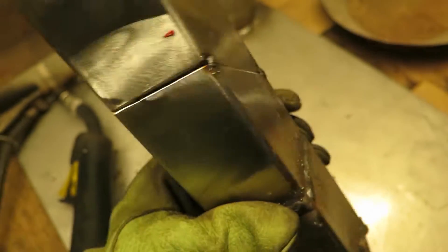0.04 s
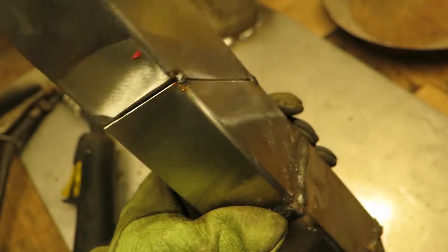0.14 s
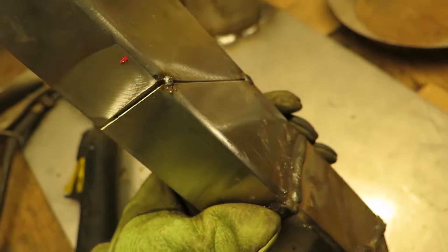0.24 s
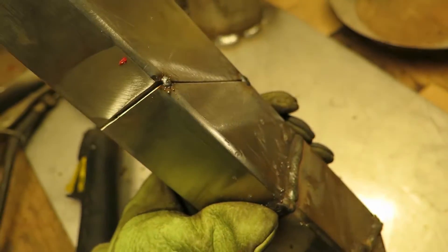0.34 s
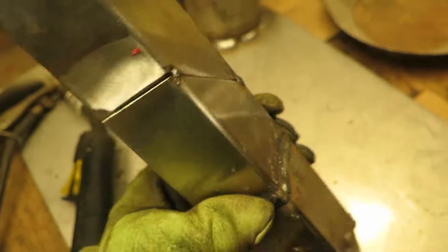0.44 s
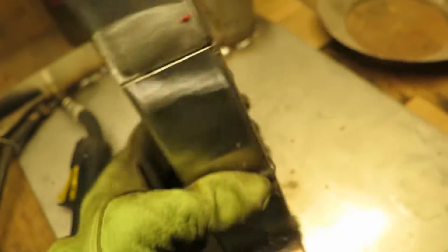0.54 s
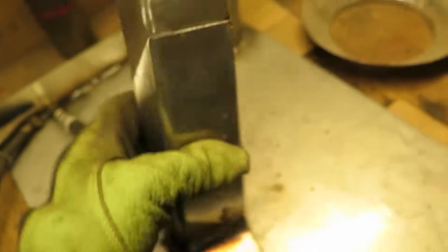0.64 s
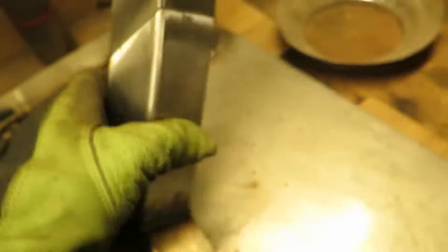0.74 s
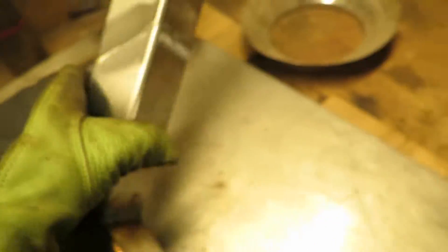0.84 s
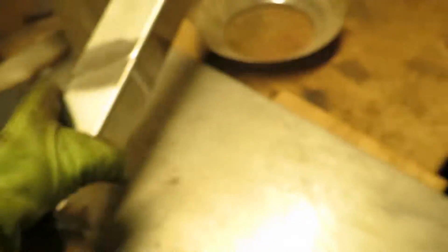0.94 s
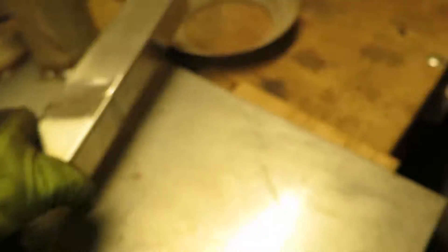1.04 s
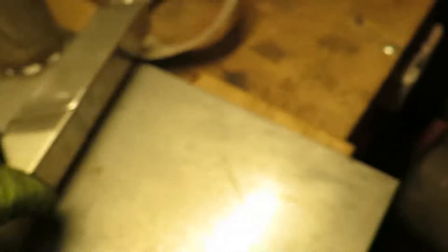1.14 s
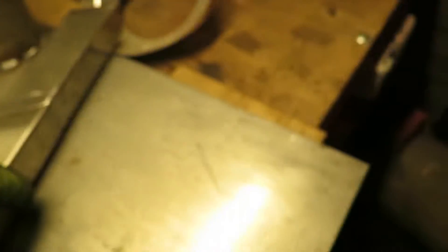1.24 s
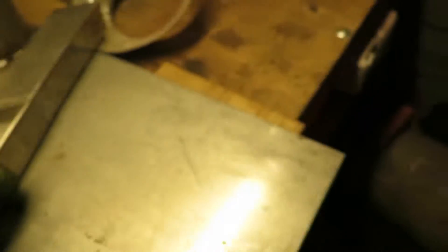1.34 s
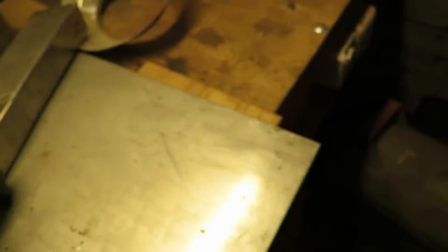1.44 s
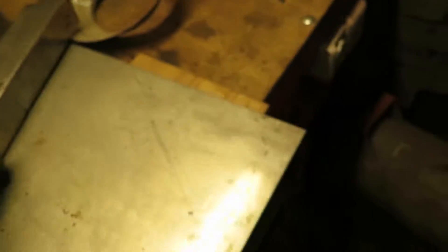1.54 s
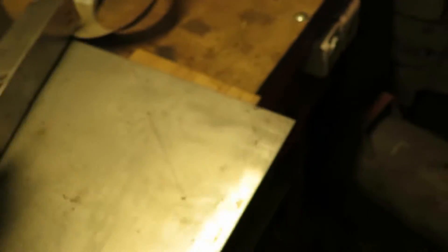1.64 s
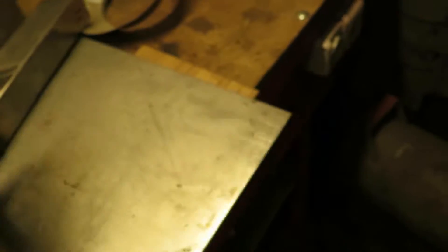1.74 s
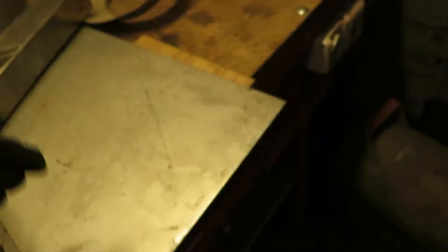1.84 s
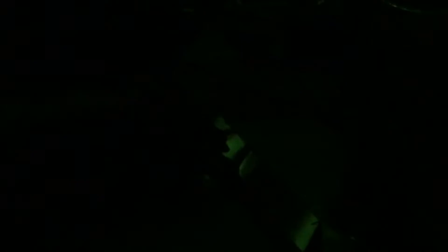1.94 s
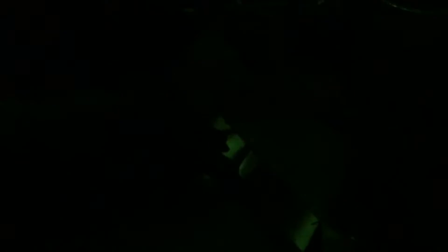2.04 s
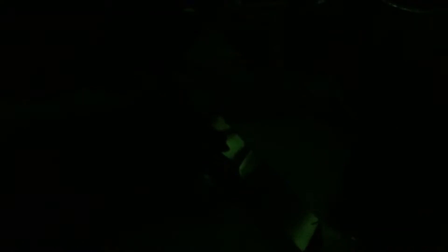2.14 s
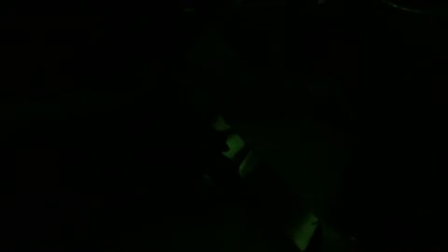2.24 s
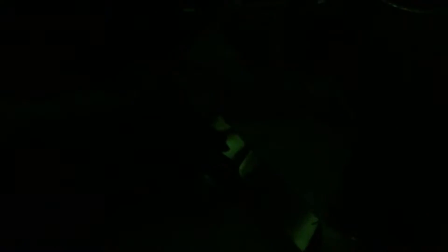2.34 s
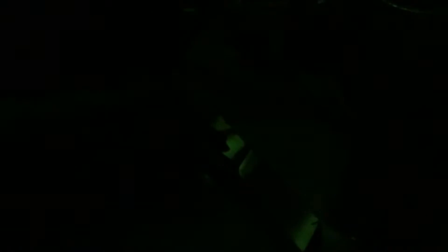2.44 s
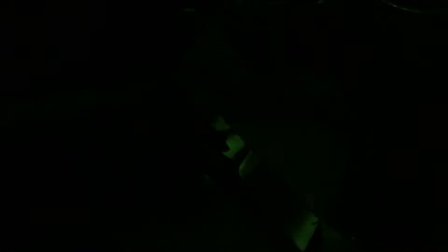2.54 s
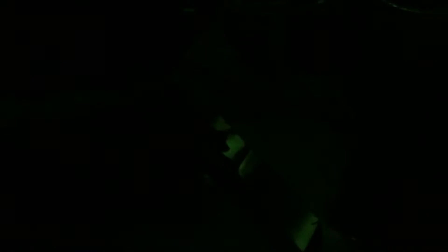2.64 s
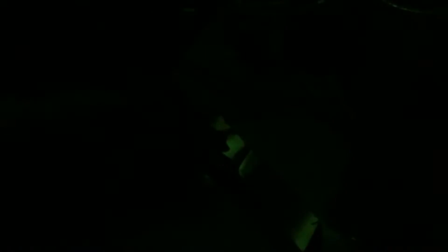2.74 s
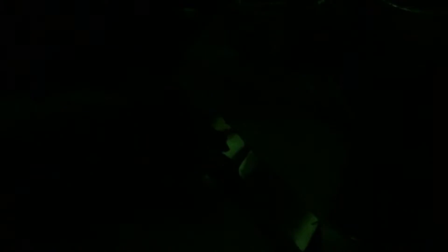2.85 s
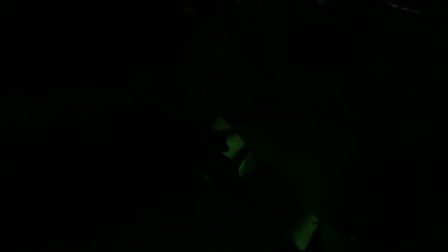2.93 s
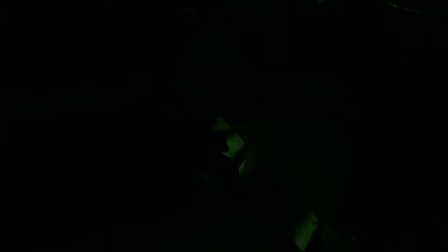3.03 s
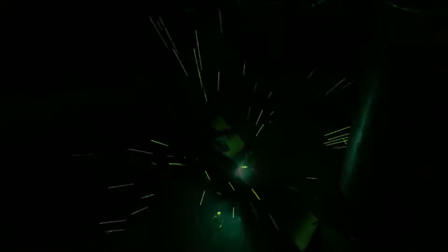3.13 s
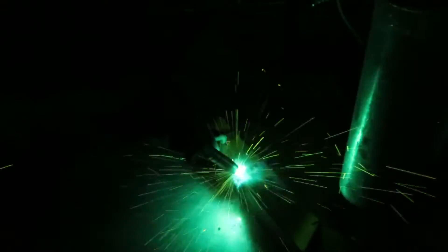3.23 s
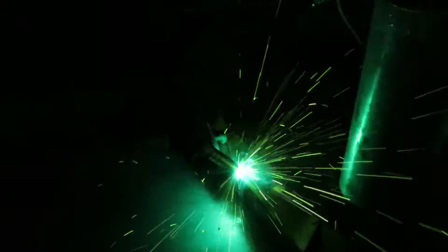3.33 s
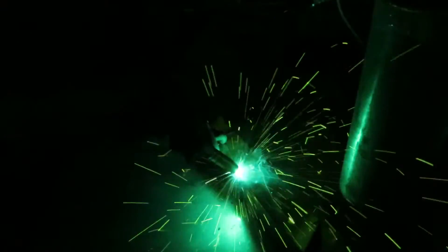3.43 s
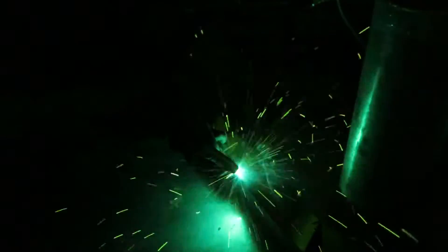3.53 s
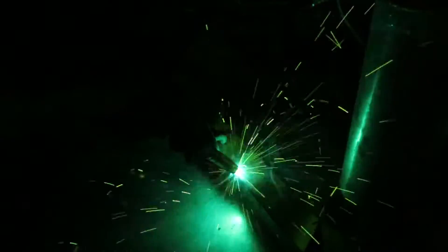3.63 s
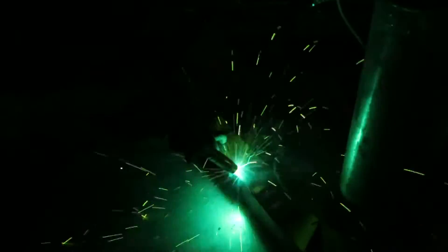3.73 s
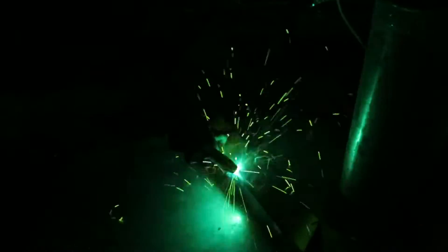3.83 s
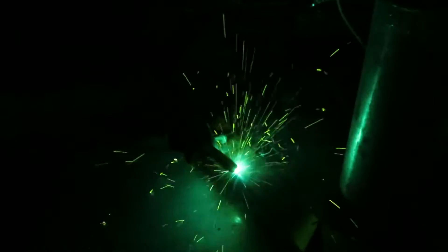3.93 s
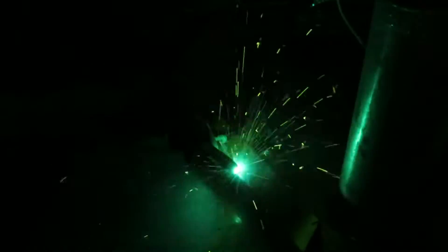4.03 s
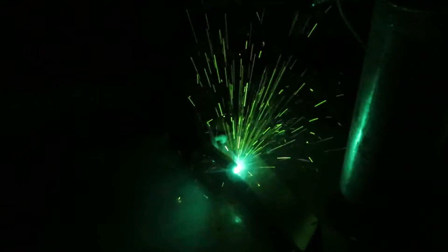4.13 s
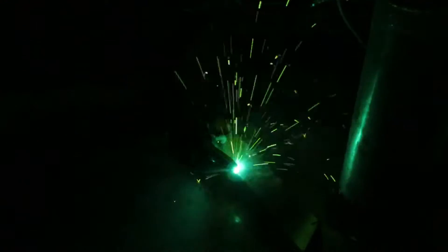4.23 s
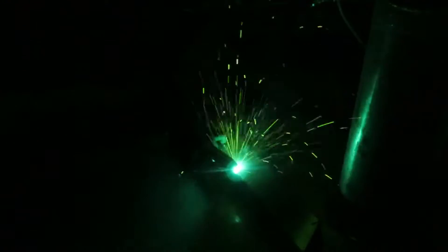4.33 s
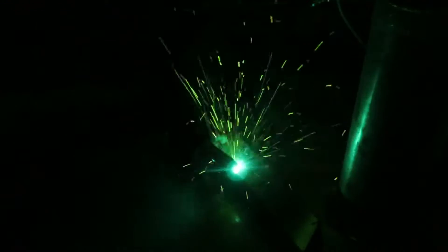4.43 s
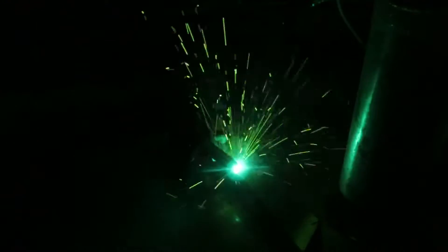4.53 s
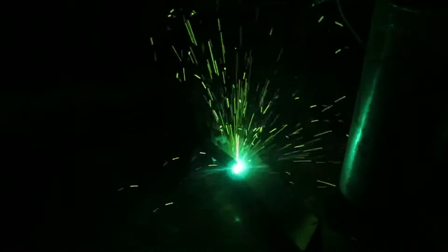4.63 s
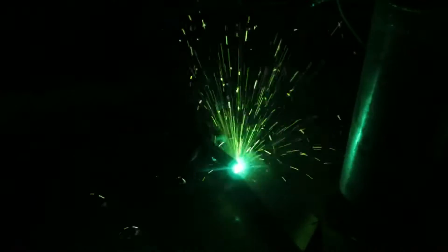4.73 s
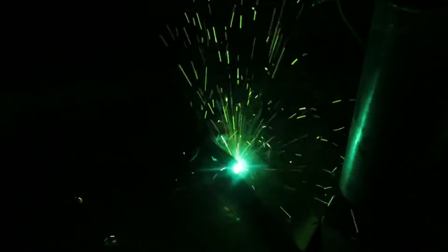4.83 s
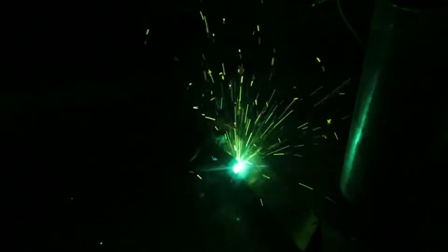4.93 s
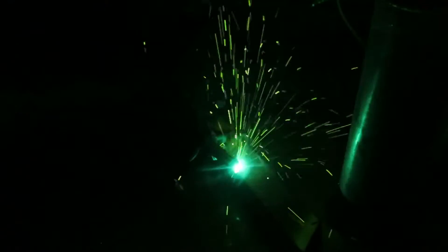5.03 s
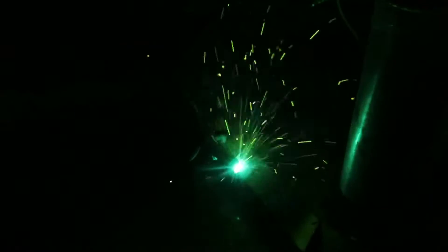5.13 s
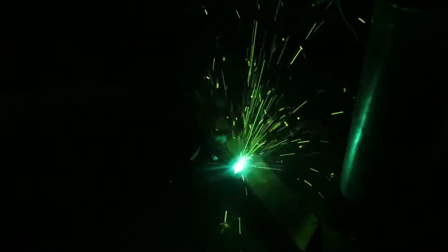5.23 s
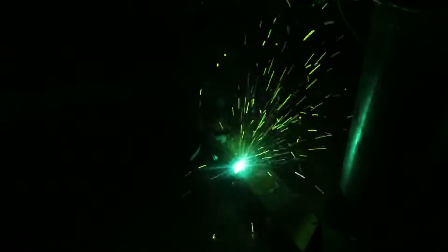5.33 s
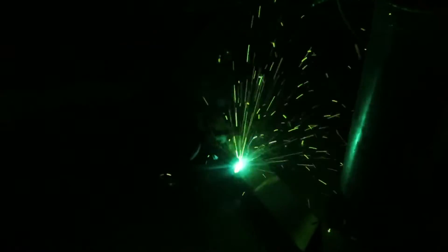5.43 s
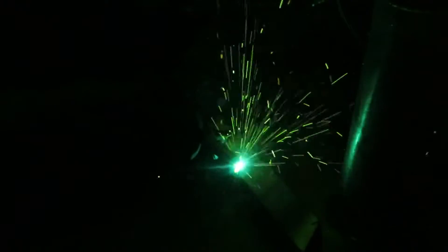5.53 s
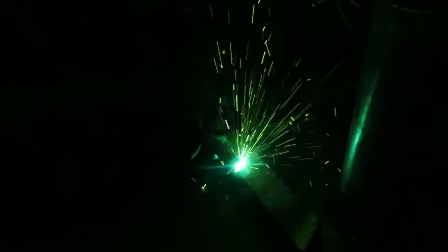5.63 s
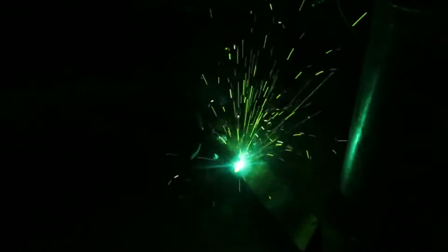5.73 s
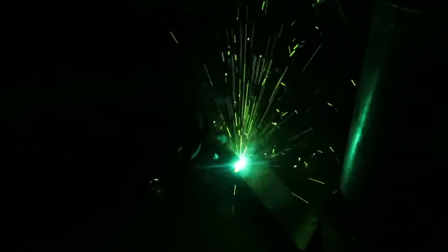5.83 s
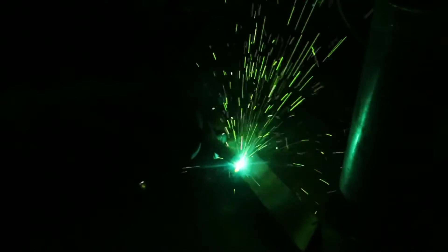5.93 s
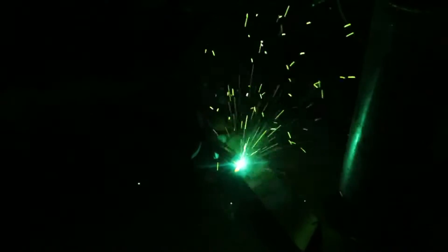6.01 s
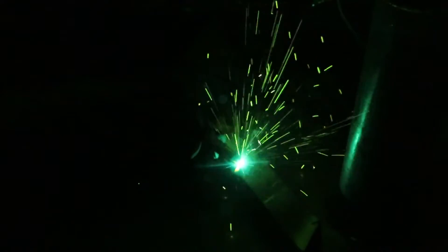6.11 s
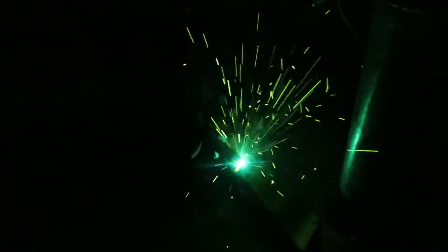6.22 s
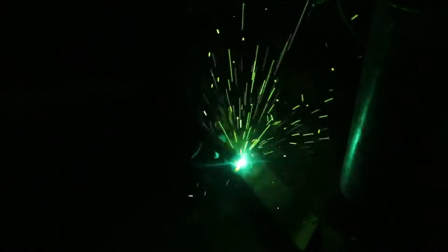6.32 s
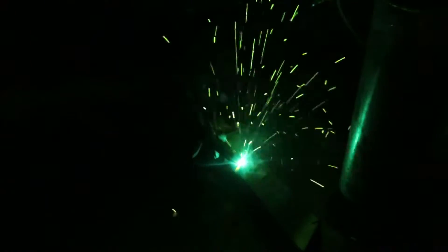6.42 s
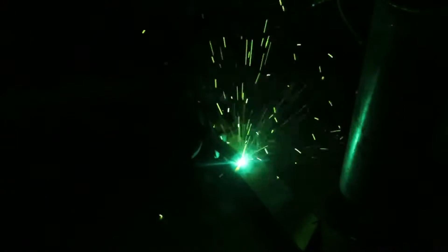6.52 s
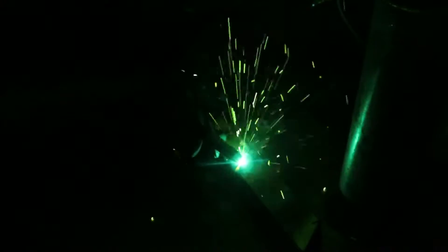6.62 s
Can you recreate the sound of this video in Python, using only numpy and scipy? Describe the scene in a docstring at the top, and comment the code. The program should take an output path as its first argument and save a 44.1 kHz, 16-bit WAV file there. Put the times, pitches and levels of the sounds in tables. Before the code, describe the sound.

In a quiet workshop, a gloved hand faintly rubs steel, then knocks and slides a folded part across a metal sheet on a bench, with short rings, thuds and rasps. The scene jumps to a welder's low hum and fan noise. Gas puffs and hisses, the wire pops, and a bright, close arc crackles steadily with spatter while the background sinks away.

```python
"""Quiet room air and faint strokes on steel; then a folded stainless part is knocked and slid over a sheet.
Slips rasp and rumble the sheet; each knock rings steel modes, thumps the bench and clashes.
An abrupt change of scene: a MIG welder hums over fan noise, gas puffs and rushes, the wire pops.
The arc then crackles from irregular snaps, fizz and spatter, with a faint singing mode of the part.
The arc is so loud that a gain control pushes hum and gas far down."""
import sys
import numpy as np
from scipy import signal
from scipy.fft import rfft, irfft
from scipy.io import wavfile
from scipy.ndimage import uniform_filter1d

SR = 44100
rng = np.random.default_rng(int(sys.argv[2]) if len(sys.argv) > 2 else 0)


def put_to_file(sound):
    """Save the sound as 16-bit audio at rate SR, in the file named by the first command-line argument."""
    columns = np.atleast_2d(sound).T  # one column per channel
    safe = np.clip(columns, -1, 1)
    whole_steps = np.round(safe * 32767)
    wavfile.write(sys.argv[1], SR, whole_steps.astype(np.int16))


N = 294147

# knocks of part on sheet: t/s, relative ring level/dB, thump re ring/dB, bright clash re ring/dB, favoured f/Hz
KNOCKS = [(0.725, -3, -6, -27, 520), (0.769, -0.5, 1.5, -31, 480), (0.778, 0, -9, -30, 576),
          (0.841, -2.5, -12, -15, 764), (0.88, -5.5, -28, -15, 836), (0.908, -4.5, -28, -11.5, 535),
          (0.986, -0.5, -21, -8, 610), (1.005, 3, -28, -18, 490), (1.043, 3, -36, -17, 836),
          (1.172, -6, -28, -13, 544), (1.223, 0, -5, 1.5, 1290), (1.435, -9, -6, -14, 510),
          (1.488, -7, -19, -1.5, 577), (1.526, -2.5, -12, -4, 846), (1.566, -10.5, 3, -25, 390),
          (1.645, -15, 0, -21, 446), (1.751, -20.5, 4.5, -30, 400), (1.805, -14.5, -8, -0.5, 1080),
          (1.832, -15, -4, -5.5, 320)]
# modes of part and sheet: f/Hz, level/dB
STEEL_MODES = [(195, -4.5), (272, -10.5), (308, -3), (398, -6.5), (464, 3), (478, -1.5), (511, -1.5),
               (530, 1), (564, 2.5), (643, -1), (707, -4), (778, -3.5), (821, 1.5), (850, -4), (991, -7.5),
               (1205, -14), (1333, -13), (1622, -10), (1690, -24), (1809, -17), (1872, -11), (2281, -15),
               (2410, -13), (2671, -13.5), (3590, -18), (4410, -20)]
# modes of the bench under the sheet: f/Hz, level/dB
BENCH_MODES = [(72, -8), (150, -4), (205, -14), (262, 3.5), (315, 2)]
# drag of the part, rumble of the sheet: t/s, relative level/dB
DRAG = [(0.0, -51), (0.28, -49), (0.66, -45), (0.746, -23), (0.878, -20.5), (0.93, -26.5), (1.026, -24),
        (1.518, -27), (1.9, -31.5)]
# strokes of glove or edge on steel: t/s, length/s, relative rasp level/dB, hiss re rasp/dB
SCRAPES = [(0.048, 0.033, -49.5, 1), (0.222, 0.071, -51.5, -0.5), (0.356, 0.025, -50, 0),
           (0.4, 0.15, -54, 1), (0.496, 0.06, -50, 2), (0.55, 0.07, -45, 0), (0.608, 0.062, -31, -9),
           (0.686, 0.035, -26, -24), (0.718, 0.018, -18.5, -8), (0.978, 0.032, -25, -26),
           (1.177, 0.058, -26, -8), (1.28, 0.013, -28.5, 1), (1.317, 0.077, -28, 1.5),
           (1.427, 0.03, -25, 1), (1.47, 0.085, -25, -23), (1.55, 0.077, -33, -17),
           (1.709, 0.0092, -33.5, -11)]
# spectrum of thud and rumble: f/Hz, level/dB
THUD_SPECTRUM = [(25, -20), (70, 3.5), (140, -7), (280, -13), (370, 0), (520, -3), (820, -2.5), (1000, -3),
                 (2000, -9.5), (4000, -16.5), (10000, -39.5)]
# spectrum of the clash of metal on metal: f/Hz, level/dB
CLASH_SPECTRUM = [(400, -31), (950, -20), (1250, 9), (1650, -2), (2400, -2), (3200, -7), (6000, -4),
                  (12000, -3.5), (15500, -17)]
# spectrum of the rasp: f/Hz, level/dB
RASP_SPECTRUM = [(300, -9), (1000, -1.5), (1500, -6), (3000, -0.5), (5000, -5.5), (8000, -9), (12400, -10),
                 (15500, -28)]
# spectrum of the edge's hiss: f/Hz, level/dB
EDGE_SPECTRUM = [(1000, -14.5), (4000, -4), (8000, -1.5), (12400, 0.5), (15500, -7)]
# spectrum of room air: f/Hz, level/dB
ROOM_SPECTRUM = [(20, -32), (40, 5), (250, 3.5), (550, -9.5), (900, -6.5), (1600, -10), (6500, -17.5),
                 (12000, -17), (15000, -34)]
# spectrum of the fan's rush: f/Hz, level/dB
FAN_SPECTRUM = [(20, -13), (45, 2.5), (110, 4), (200, 0.5), (270, -9), (700, -7), (1150, -8), (1700, -9),
                (2500, -11.5), (4200, -14.5), (8500, -17.5), (12200, -16), (13500, -35), (15000, -49)]
# spectrum of steady gas flow: f/Hz, level/dB
GAS_SPECTRUM = [(300, -25), (900, -20), (1450, -0.5), (2000, -14), (3200, -11.5), (3500, -5.5), (4200, -4),
                (5200, 6), (6600, -1), (8200, 3.5), (10700, -0.5), (12000, 4.5), (13200, -9), (14600, 3),
                (15300, -30)]
# spectrum of the valve's puff: f/Hz, level/dB
PUFF_SPECTRUM = [(40, -5), (300, 3), (900, 16), (2000, 3), (5000, 3), (15000, -36)]
# arc spectrum at the start, also of the pops: f/Hz, level/dB
ARC_EARLY_SPECTRUM = [(40, -33), (175, -11), (270, -16), (600, -14.5), (840, -16.5), (1000, -13.5),
                      (1480, -10), (1750, -21), (2450, -10), (3200, -14), (3480, -7), (5200, -7),
                      (6400, -10.5), (7600, -3.5), (9000, -5.5), (10500, 0), (12000, -1.5), (14000, -0.5),
                      (15500, -11)]
# arc spectrum further along the seam: f/Hz, level/dB
ARC_LATE_SPECTRUM = [(40, -35), (110, -20.5), (180, -16), (270, -19.5), (600, -19), (840, -22.5),
                     (1000, -16), (1480, -15.5), (1750, -26), (2450, -12.5), (3200, -15), (3600, -7.5),
                     (5200, -8), (6400, -9.5), (7500, -7), (9000, -4.5), (10000, -1), (12500, -1.5),
                     (15500, -6)]
# stereo width of near sounds: f/Hz, side minus mid/dB
WIDTH = [(100, -9), (500, 0), (1200, -4), (2500, -3.5), (6000, 1), (15000, 0)]
# shaft, transformer and blade tones: f/Hz, level/dB, change as the gas valve opens/dB
HUM = [(46.5, -38.5, -0.5), (100.1, -36, -1.5), (137, -40, -2), (640.5, -41.5, -12), (1072, -46.5, -1),
       (1347, -50, -5)]
# narrow resonances of the fan: f/Hz, width/Hz, strength/dB
FAN_WHISTLES = [(1134, 145, 5), (10600, 65, 4), (11130, 60, 10.5), (12170, 79, 8.5), (13100, 110, 12),
                (13900, 140, 18)]
# narrow resonances of the nozzle: f/Hz, width/Hz, strength/dB
NOZZLE_PEAKS = [(4280, 130, 7.5), (4990, 250, 1.5), (5250, 340, -6.5), (9800, 71, 7), (12000, 400, 6)]
# narrow resonances in the arc's sound: f/Hz, width/Hz, strength/dB
SEAM_PEAKS = [(464, 17, -1.5), (668, 48, 1), (1117, 110, 0), (2140, 140, 2), (5000, 270, 0),
              (7400, 870, -3.5), (12000, 170, 2.5)]
# narrow hollows in the colour of gas and burning arc: f/Hz, width/Hz, depth/dB
HOLLOWS = [(3470, 150, -7.5), (4590, 150, -4.5), (5730, 320, -3), (6690, 160, -12.5), (9000, 260, -12),
           (11300, 440, -1)]
# wire touches with a faint fizz, then blows apart: t/s, relative level/dB, t60/s
STRIKES = [(3.218, -51, 0.23), (3.2305, 3, 0.019), (3.2900, -3, 0.043), (3.3345, -9, 0.18)]
# droplets bursting into a spray: t/s, relative starting level/dB, t60/s
SPATTER = [(3.4261, -14.5, 0.061), (3.6019, -13, 0.073), (3.708, -18.5, 0.085), (3.8, -14, 0.085),
           (3.857, -22, 0.12), (3.9565, -17, 0.12), (4.0578, -18, 0.075), (4.856, -15.5, 0.11),
           (4.9202, -12, 0.11), (4.9972, -16, 0.033), (5.0794, -10, 0.058), (5.155, -12.5, 0.04),
           (5.3361, -19, 0.082), (5.387, -10.5, 0.04), (5.4873, -18.5, 0.078), (5.549, -13.5, 0.036),
           (5.718, -15, 0.047), (5.8211, -11, 0.041), (5.8948, -12, 0.04), (6.03, -14.5, 0.041),
           (6.0816, -17, 0.029), (6.106, -9.5, 0.038), (6.145, -16, 0.05), (6.2941, -11, 0.041),
           (6.31, -10.5, 0.06), (6.4048, -21, 0.071), (6.5589, -12, 0.032), (6.6177, -22, 0.043)]
# burn of the arc: t/s, relative level/dB
BURN = [(3.46, -20.5), (3.54, -17.5), (3.63, -24.5), (3.72, -21.5), (3.76, -25.5), (3.87, -22), (4.44, -23),
        (4.6, -21), (4.85, -25), (4.95, -22.5), (5.25, -25.5), (5.34, -25), (5.42, -27.5), (5.91, -20.5),
        (6.07, -20), (6.12, -25), (6.29, -21.5), (6.34, -20.5), (6.39, -21), (6.64, -22)]
# balance of the arc between the channels: t/s, left minus right/dB
TORCH_PAN = [(3.3, -2), (4.8, -1.5), (5.5, -1.5), (6.6, -1.5)]
# faint singing of the heated part: t/s, relative level/dB
SINGING = [(3.4, -62), (4.8, -72), (5.0, -49.5), (5.3, -53), (5.55, -58), (5.67, -51.5), (5.79, -44),
           (5.9, -57), (6.6, -73)]

CUT_S = 1.905  # handling ends, welder is running
# steel and bench
FAVOUR_DB, FAVOUR_OCTAVES = 11, 0.25  # contact point favours modes around one frequency
CONTACT_DETUNE, BENCH_T60_S = 0.006, 0.11
UPPER_FROM_HZ, UPPER_WIDTH_HZ, UPPER_DB = 950, 20, 4.5  # steel modes standing out of noise; strength
# sliding
DRAG_RASP_DB = -13  # re drag rumble
RATTLE_DB, RATTLE_T60_S = -23, 0.25  # rattling on after a knock, re knock
SCRAPE_RUMBLE_DB, SCRAPE_RING_DB = -7.5, -6  # re scrape rasp
SCRAPE_SWELL, SCRAPE_T60_S = 0.3, 0.18  # swell as share of stroke length; release
# gas
VALVE_S, VALVE_RISE_S = 2.940, 0.043
FLOW_DB, OVERSHOOT_DB, SETTLE_S = -19.5, 9.5, 0.15
# arc
STEADY_S = 3.425  # sputtering ends, full burn
SHORT_LEAD_S = 0.0009  # median lead of shorting tick over snap
PING_HZ, PING_T60_S = 12350, 0.0022
PING_DB, PING_PAN_DB = -6, 1.5  # re burn; left minus right, ahead of TORCH_PAN
ARC_LOUDER_DB = 40  # boost of the arc and largest gain cut
TOP_HZ = 15700


def undb(db):
    """Decibels to gain."""
    return np.exp(np.asarray(db) * (np.log(10) / 20))


def unit(x):
    """Scale to rms 1."""
    return x / np.sqrt(np.mean(x ** 2) + 1e-18)


def clock():
    """Time of every sample in s."""
    return np.arange(N) / SR


def curves(table):
    """Table columns, interpolated linearly in time."""
    s, *columns = np.transpose(table)
    return [np.interp(clock(), s, c) for c in columns]


def after(s, fade=0.003):
    """Linear switch-on from time s over fade seconds."""
    return np.clip((clock() - s) / fade, 0, 1)


def walk(rate):
    """Random levels at a rate in Hz, joined by straight lines; spread near 1."""
    knots = rng.standard_normal(N // max(int(SR / rate), 1) + 2)
    position = np.linspace(0, len(knots) - 1, N)
    return np.sqrt(3 / 2) * np.interp(position, np.arange(len(knots)), knots)


def noise():
    """Two independent white noises."""
    return rng.standard_normal((2, N), dtype=np.float32)


def clicks(times, sizes):
    """Single-sample impulses."""
    index = np.clip(np.asarray(times) * SR, 0, N).astype(int)
    return np.bincount(index, sizes, N + 1)[:N]


def add(track, s, sound):
    """Mix a short sound into a track at time s."""
    start = int(s * SR)
    track[start:start + len(sound)] += sound[:N - start]


def through(x, response):
    """Convolve with one response or a left and a right one."""
    x, response = (np.atleast_2d(v).astype(np.float32) for v in (x, response))
    return signal.oaconvolve(x, response, axes=1)[:, :N]


def colour(x, points, peaks=(), hollows=(), size=4096):
    """Minimum-phase filter; a peak adds twice its strength as power, a hollow cuts by its depth."""
    f = np.maximum(np.arange(size // 2 + 1) * SR / size, 1)
    hz, db = np.transpose(points)
    power = 1 + sum(undb(2 * d) * 2 / (1 + (2 * (f - c) / w) ** 2) for c, w, d in peaks)
    hollow_db = sum(d * np.exp(-(2 * (f - c) / w) ** 2) for c, w, d in hollows)
    broad_db = np.interp(np.log(f), np.log(hz), db)
    # fold the cepstrum to make the filter causal
    cepstrum = irfft(np.log(undb(broad_db + hollow_db) * np.sqrt(power)))
    cepstrum[1:size // 2] *= 2
    cepstrum[size // 2 + 1:] = 0
    return through(x, irfft(np.exp(rfft(cepstrum))))


def stereo(pair):
    """Two signals as mid and side; WIDTH sets how unlike the channels are at each frequency."""
    side = colour(pair[1], WIDTH)[0]
    return np.array([pair[0] + side, pair[0] - side])


def fall(t60, size=16384):
    """Exponential decay, t60 in s, cut off after size samples."""
    return np.exp(-np.log(1000) * np.arange(size) / SR / t60)


def echoes(t60, size=16384):
    """Two tails of dense reflections, each near unit energy."""
    return unit(rng.standard_normal((2, size)) * fall(t60)) / np.sqrt(size)


def even(pair, size=48):
    """Flatten the broad colour of reflections, keeping their scatter in time."""
    hz = np.maximum(np.fft.rfftfreq(pair.shape[1], 1 / SR), 1)
    db = 10 * np.log10(uniform_filter1d(np.abs(rfft(pair)) ** 2, size) + 1e-12)
    return np.array([colour(r, np.c_[hz, -d])[0] for r, d in zip(pair, db)])


def bursts(rows, tail_db, tail_t60):
    """Envelope of (t/s, level/dB, t60/s) blows, each with a weaker, longer room tail."""
    power = np.zeros(N)
    for s, db, t60 in rows:
        add(power, s, undb(2 * db) * (fall(t60) ** 2 + (undb(tail_db) * fall(tail_t60)) ** 2))
    return np.sqrt(power)


def workshop():
    """Room air: coloured noise with one narrow resonance and a wavering level."""
    air = unit(colour(stereo(noise()), ROOM_SPECTRUM, [(1140, 11.6, 15.7)]))
    return undb(-43.0 + walk(2.2)) * air


def strokes(rows):
    """Envelope of (t/s, length/s, level/dB) strokes: each swells, holds and dies away."""
    power = np.zeros(N)
    for s, length, db in rows:
        held = np.arange(int((length + SCRAPE_T60_S) * SR)) / SR
        swell = np.minimum(held / (SCRAPE_SWELL * length), 1)
        release = np.exp(-np.log(1000) * np.maximum(held - length, 0) / SCRAPE_T60_S)
        add(power, s, (undb(db) * swell * release) ** 2)
    return np.sqrt(power)


def metallic(x, points):
    """Coloured noise with the upper steel modes standing out."""
    peaks = [(hz, UPPER_WIDTH_HZ, UPPER_DB) for hz, _ in STEEL_MODES if hz > UPPER_FROM_HZ]
    return unit(colour(x, points, peaks))


def steel_ring(t60_at_500hz, tilt_db=0, favoured_hz=500, favour_db=0, size=16384):
    """Decaying steel modes, reweighted and detuned per contact; hard contact tilts them up (dB/octave)."""
    t = np.arange(size, dtype=np.float32) / SR
    hz, db = np.transpose(STEEL_MODES)[:, :, None].astype(np.float32)
    weight, detune, side = rng.standard_normal((3, len(STEEL_MODES), 1), dtype=np.float32)
    decay = np.exp(-np.float32(np.log(1000) / t60_at_500hz) * (hz / 500) ** 0.16 * t)
    favour = favour_db * np.exp(-(np.log2(hz / favoured_hz) / FAVOUR_OCTAVES) ** 2)
    gain = np.sign(side) * undb(db + favour + 2.8 * weight + tilt_db * np.log2(hz / 500))
    tones = np.sin(2 * np.pi * hz * (1 + CONTACT_DETUNE * detune) * t)
    return np.sum(gain * decay * tones, 0) / np.sqrt(np.sum(gain ** 2))


def scrape_rings(slips):
    """Each stroke touches another spot, so its slips bring out other high steel modes."""
    track = np.zeros(N)
    for s, length, db, _ in SCRAPES:
        push = unit(slips[int(s * SR):int((s + length) * SR)])
        ring = steel_ring(t60_at_500hz=0.34, tilt_db=7.5)
        add(track, s, undb(db) * signal.fftconvolve(push, ring / np.linalg.norm(ring)))
    return track


def sliding():
    """Edge slips in tiny steps that rasp and rumble the sheet; scrapes and knocks stir it up."""
    drag = undb(curves(DRAG)[0])
    scrape = strokes([(s, length, db) for s, length, db, _ in SCRAPES])
    hiss = strokes([(s, length, db + hiss_db) for s, length, db, hiss_db in SCRAPES])
    rattle_rows = [(s, db + RATTLE_DB, RATTLE_T60_S) for s, db, *_ in KNOCKS]
    rattle = bursts(rattle_rows, tail_db=-24, tail_t60=0.6)
    chance = rng.standard_normal((9000, 2))
    slip_sizes = np.sign(chance[:, 0]) * undb(3.3 * np.clip(chance[:, 1], -2, 2))
    slips = clicks(rng.uniform(0, N / SR, len(chance)), slip_sizes)
    paths = even(echoes(t60=0.025) + undb(-1) * echoes(t60=0.22))
    judder = stereo(through(slips, paths))
    sheet_ring = unit(through(slips, steel_ring(t60_at_500hz=0.12)))
    rumble = unit(undb(-4.5) * metallic(judder, THUD_SPECTRUM) + sheet_ring)
    shaking = np.sqrt(drag ** 2 + rattle ** 2 + (undb(SCRAPE_RUMBLE_DB) * scrape) ** 2)
    rasping = np.hypot(scrape, undb(DRAG_RASP_DB) * drag)
    rasp = rasping * metallic(judder, RASP_SPECTRUM)
    edge_hiss = hiss * unit(colour(judder, EDGE_SPECTRUM))
    grip = undb(1.36 * walk(53.7))  # uneven pressure of the hand
    rubbing = grip * (undb(-2.0) * shaking * rumble + undb(3.5) * (rasp + edge_hiss))
    return rubbing + undb(SCRAPE_RING_DB) * scrape_rings(slips)


def bench_thump():
    """Low, quickly damped bench modes, detuned anew for each blow."""
    decay = fall(BENCH_T60_S)
    t = np.arange(len(decay)) / SR
    detune = 1 + 0.039 * rng.standard_normal(len(BENCH_MODES))
    tones = 0
    for k, (hz, db) in enumerate(BENCH_MODES):
        tones = tones + (-1) ** k * undb(db) * np.sin(2 * np.pi * hz * detune[k] * t)
    return decay * tones


def knocks():
    """Each blow thumps the bench, clashes metal on metal and rings the steel."""
    thud = bursts([(s, db, .06) for s, db, *_ in KNOCKS], tail_db=-2.5, tail_t60=0.83)
    clash_rows = [(s, db + bright_db, .06) for s, db, _, bright_db, _ in KNOCKS]
    clash = bursts(clash_rows, tail_db=-16, tail_t60=0.53)
    ring, thump = np.zeros(N), np.zeros(N)
    for s, db, thump_db, bright_db, hz in KNOCKS:
        tilt_db = 0.22 * (bright_db + 19.5)
        blow = steel_ring(t60_at_500hz=0.22, tilt_db=tilt_db, favoured_hz=hz, favour_db=FAVOUR_DB)
        add(ring, s, undb(db) * blow)
        add(thump, s, undb(db + thump_db) * bench_thump())
    crash = stereo(noise())
    tonal = undb(-12.0) * ring + undb(-14) * thump
    thud_noise = undb(-28.5) * thud * unit(colour(crash, THUD_SPECTRUM))
    return tonal + thud_noise + undb(-8.0) * clash * metallic(crash, CLASH_SPECTRUM)


def welder():
    """Power source: shaft, transformer and blade tones wavering together over the fan's rush."""
    turn = 2 * np.pi * np.cumsum(1 + 0.0023 * walk(8.06)) / SR
    opened = after(VALVE_S, fade=VALVE_RISE_S)
    tones = 0
    for hz, db, change_db in HUM:
        tone = np.sqrt(2) * np.sin((hz * turn).astype(np.float32))
        tones = tones + undb(db + change_db * opened) * tone
    air = unit(colour(stereo(noise()), FAN_SPECTRUM, FAN_WHISTLES))
    return tones + undb(-29 + 0.26 * walk(27.13)) * air


def gas():
    """Valve opens with a puff; pressure stored in the hose rushes out, then settles to steady flow."""
    flow_db = FLOW_DB + OVERSHOOT_DB * np.exp(-((clock() - VALVE_S) / SETTLE_S) ** 2)
    rush = stereo(noise())
    puff_level = bursts([(VALVE_S, -23, 0.16)], tail_db=-10.0, tail_t60=0.63)
    puff = puff_level * unit(colour(rush, PUFF_SPECTRUM))
    flow = unit(colour(rush, GAS_SPECTRUM, NOZZLE_PEAKS, HOLLOWS))
    return puff + after(VALVE_S, fade=VALVE_RISE_S) * undb(flow_db + 0.24 * walk(66.2)) * flow


def strikes():
    """Cold wire explodes on contact before the arc holds: decaying noise bursts."""
    level = bursts(STRIKES, tail_db=-21.5, tail_t60=0.15)
    return level * unit(colour(stereo(noise()), ARC_EARLY_SPECTRUM))


def reflections(x, count=4):
    """Echoes from part, sheet and walls, crossfading as the torch moves from spot to spot."""
    spot = np.interp(clock(), [STEADY_S, N / SR], [0, count - 1])
    heard = 0
    for k in range(count):
        near = echoes(t60=0.0079) + undb(-2.5) * echoes(t60=0.041)
        paths = even(near + undb(-0.5) * echoes(t60=0.079))
        heard = heard + through(x * np.sqrt(np.maximum(1 - np.abs(spot - k), 0)), paths)
    return stereo(heard)


def spatter():
    """Droplets burst with a crack and a short, gritty spray."""
    track = np.zeros(N)
    for s, db, t60 in SPATTER:
        spray = fall(t60) + undb(-2.5) * fall(t60=0.0025)
        add(track, s, undb(db + 1.5) * rng.standard_normal(len(spray)) * spray)
    return track * undb(1.74 * walk(700))


def arc(dips_hz=198, scatter=.15, spread_db=2.5, surges_per_s=45, count=1500):
    """Wire dips into the pool, arc snaps alight again, unevenly; droplets fizz and spatter."""
    level_db, pan_db = curves(BURN) + curves(TORCH_PAN)
    chance = rng.standard_normal((count, 6))
    # dips_hz and surges_per_s set the median intervals
    times = np.cumsum(np.exp(scatter * chance[:, 0])) / dips_hz
    snaps = clicks(times, undb(spread_db * np.clip(chance[:, 1], -2, 2)))
    # softer tick of the wire shorting ahead of each snap
    short_times = times - SHORT_LEAD_S * np.exp(.15 * chance[:, 2])
    shorts = clicks(short_times, -undb(-4.0 + 2.7 * np.clip(chance[:, 3], -2, 2)))
    fizz = rng.standard_normal(N) * undb(2.24 * walk(900))
    # current surges at once and sags back
    kick_times = np.cumsum(np.exp(.45 * chance[:, 4])) / surges_per_s
    kicks = clicks(kick_times, np.minimum(np.abs(chance[:, 5]), 1.5))
    current = unit(1 + 0.62 * through(kicks, fall(t60=0.087))[0]) * undb(level_db + 2.5)
    # weak sputter from the second pop, catches at the third, then full burn
    catching = 0.56 * after(STRIKES[-2][0]) + 0.18 * after(STRIKES[-1][0]) + 0.44 * after(STEADY_S)
    current = current * catching
    crackle = current * unit(unit(snaps + shorts) + undb(2.0) * unit(fizz)) + spatter()
    heard = reflections(crackle)
    # colour shifts as the torch travels along the seam
    travel = after(4.29, fade=0.74)
    early, late = (np.array([unit(channel) for channel in colour(heard, shape, SEAM_PEAKS, HOLLOWS)])
                   for shape in (ARC_EARLY_SPECTRUM, ARC_LATE_SPECTRUM))
    burn = np.std(crackle) * ((1 - travel) * early + travel * late)
    # further along, each snap also arrives directly as a short, very bright ping
    phase = rng.uniform(0, 2 * np.pi, (2, 1))
    ping_tone = np.sin(2 * np.pi * PING_HZ * np.arange(512) / SR + phase)
    ping = fall(PING_T60_S, size=512) * ping_tone
    sparks = clicks(times, np.sign(chance[:, 2]) * undb(spread_db * chance[:, 1]))
    ping_gain = undb(PING_DB + np.array([[PING_PAN_DB], [-PING_PAN_DB]]) / 2)
    pings = ping_gain * travel * current * unit(through(sparks, ping))
    return (burn + pings) * undb(np.array([pan_db, -pan_db]) / 2)


def singing(hz=478):
    """One wavering mode of the part, kept going by the arc."""
    level_db, = curves(SINGING)
    level = after(SINGING[0][0]) * undb(level_db + 3.2 * walk(25))
    return level * np.sin(2 * np.pi * np.cumsum(hz + 7 * walk(40)) / SR)


def scene():
    """Handling, then welding after the abrupt change of scene."""
    handling = workshop() + sliding() + knocks()
    welding = welder() + gas() + undb(ARC_LOUDER_DB) * (strikes() + arc() + singing())
    return handling * (1 - after(CUT_S - .012, fade=0.012)) + welding * after(CUT_S, fade=.015)


def gain_control(x, ceiling_db=0.0, release_db_per_s=0.08, size=64):
    """Welding peaks over the ceiling cut the gain at once, within a limit; it creeps back slowly."""
    peak_db = 20 * np.log10(np.abs(x).max(0) + 1e-9)
    over_db = np.clip(peak_db - ceiling_db, 0, ARC_LOUDER_DB) * after(CUT_S)
    recovery_db = release_db_per_s * clock()
    cut_db = np.maximum.accumulate(over_db + recovery_db) - recovery_db
    # averaged over the samples ahead
    return x * undb(-uniform_filter1d(cut_db, size, origin=-(size // 2)))


def record(dry):
    """Ride the gain, clip the sharpest peaks, low-pass the top."""
    low_pass = signal.ellip(10, .2, 70, TOP_HZ, fs=SR, output="sos")
    return signal.sosfilt(low_pass, np.clip(gain_control(dry), -1, 1))


dry = scene()
out = record(dry)
put_to_file(out)
```